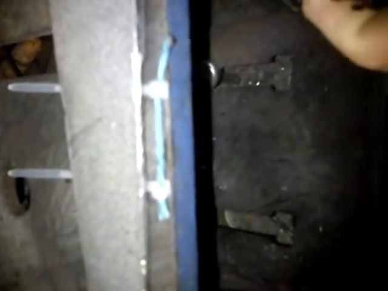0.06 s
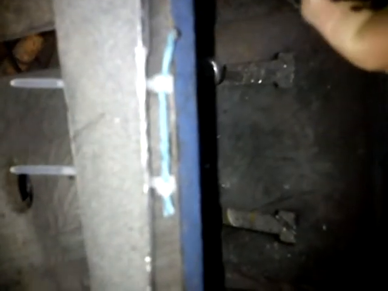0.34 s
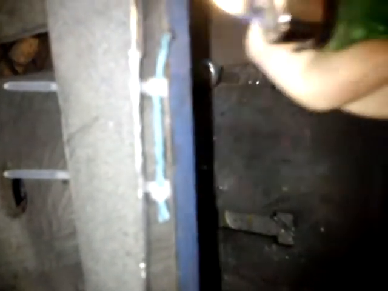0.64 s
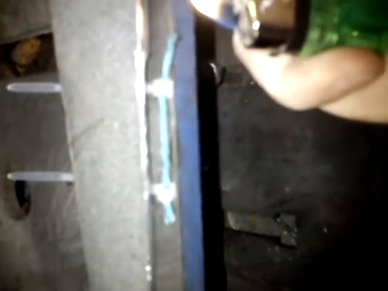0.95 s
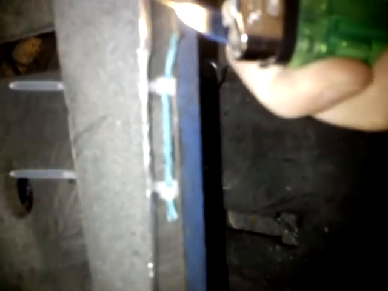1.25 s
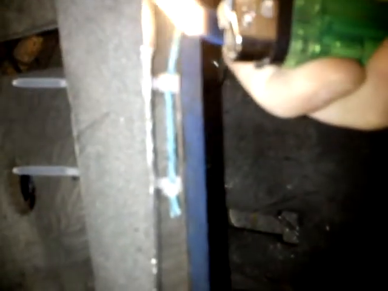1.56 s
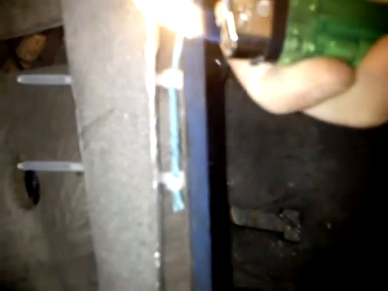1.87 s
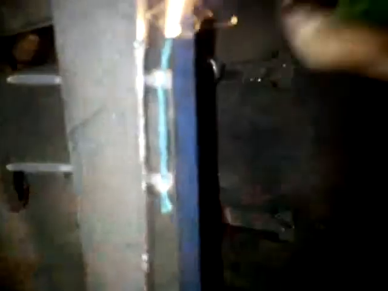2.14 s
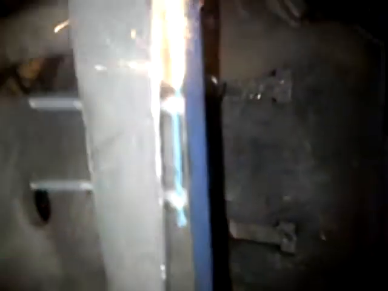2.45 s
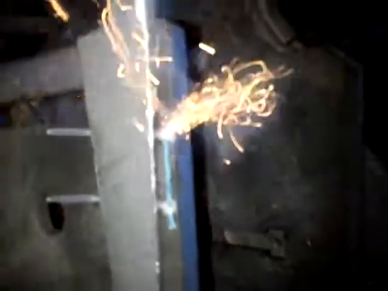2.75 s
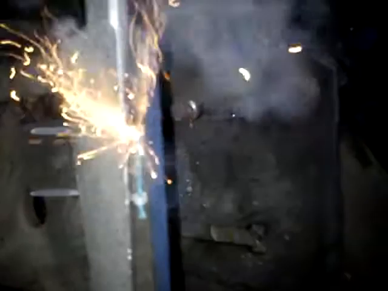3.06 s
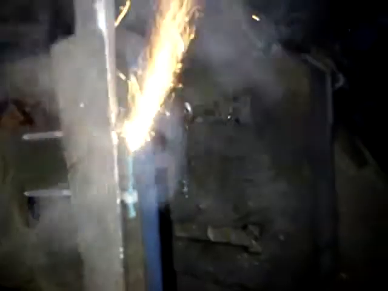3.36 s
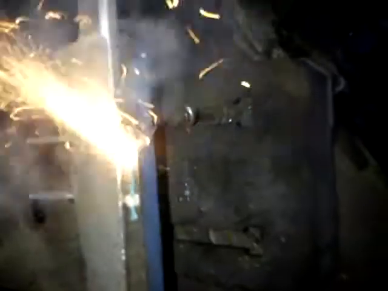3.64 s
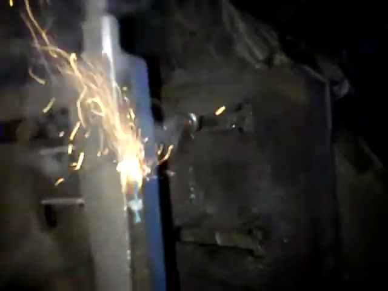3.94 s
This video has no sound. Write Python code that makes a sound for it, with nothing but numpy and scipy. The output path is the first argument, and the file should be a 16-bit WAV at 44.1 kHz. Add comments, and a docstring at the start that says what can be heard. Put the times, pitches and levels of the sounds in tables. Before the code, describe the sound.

A lighter flicks, then a fuse catches and hisses, choking briefly before flaring again.

```python
"""A faint hum hangs in the outdoor air; a flint lighter clicks and is struck to light a fuse on a board.
Friction of wheel on flint rings the lighter's metal hood and throws sparks. The fuse sputters, catches
and burns as a turbulent jet of hissing gas and sparks, which chokes under a tie and bursts out again.
Hard surfaces close by colour the hiss with resonances and short echoes."""
import sys
import numpy as np
from scipy import signal
from scipy.fft import rfft, irfft
from scipy.io import wavfile

SR = 44100
rng = np.random.default_rng(int(sys.argv[2]) if len(sys.argv) > 2 else 0)


def int16_out(signal):
    """Quantize to a 16-bit WAV file."""
    q = np.round(np.clip(np.atleast_2d(signal).T, -1, 1) * 32767)
    wavfile.write(sys.argv[1], SR, q.astype(np.int16))


N = 176400
T = np.arange(N) / SR


def from_db(db):
    """Decibels to amplitude ratio."""
    return 10 ** (np.asarray(db) / 20)


def unit_power(x):
    """Normalisation to a mean square of one."""
    return x / np.sqrt(np.mean(x ** 2) + 1e-20)


def in_time(rows):
    """Linear interpolation of each column at every sample."""
    times, *columns = np.transpose(rows)
    return [np.interp(T, times, column) for column in columns]


def colour(x, spectrum):
    """Minimum-phase filtering to a spectral shape, with unit power gain."""
    hz, db = np.transpose(spectrum)
    grid = np.maximum(np.arange(N + 1) * SR / (2 * N), 1)
    gain = unit_power(from_db(np.interp(np.log(grid), np.log(hz), db)))
    cepstrum = irfft(np.log(gain))
    cepstrum[1:N] *= 2
    return irfft(rfft(x, 2 * N) * np.exp(rfft(cepstrum[:N], 2 * N)))[:N]


def noise(spectrum):
    """Filtered Gaussian noise of unit power."""
    return colour(rng.standard_normal(N), spectrum)


def resonate(x, hz, width):
    """A damped resonator with unit peak gain."""
    r = np.exp(-np.pi * width / SR)
    feedback = [1, -2 * r * np.cos(2 * np.pi * hz / SR), r * r]
    return signal.lfilter(np.array([1, 0, -1]) * (1 - r * r) / 2, feedback, x)


def flutter(spread_db, rate_hz=35):
    """Random amplitude modulation: a gain driven by low-passed noise."""
    r = np.exp(-2 * np.pi * rate_hz / SR)
    drift = signal.lfilter([1], [1, -2 * r, r * r], rng.standard_normal(N + SR))[SR:]
    return from_db(spread_db * unit_power(drift))


def grains(per_s, spread_db):
    """Shot noise: random impulses of uneven size, at unit power."""
    sizes = from_db(spread_db * np.minimum(rng.exponential(1, N), 4))
    return unit_power(sizes * rng.choice([-1, 1], N) * (rng.random(N) < per_s / SR))


def swell(start, rise, decay, db):
    """A transient's envelope: linear rise, exponential decay."""
    return from_db(db) * np.clip((T - start) / rise, 0, 1) * np.exp(-np.maximum(T - start - rise, 0) / decay)


def cracks(rows, spectrum, decay_s):
    """Impulsive sounds: damped noise bursts, each scaled to its peak level."""
    out = np.zeros(N)
    age = T[:SR // 50]
    bursts = rng.standard_normal((len(rows), len(age))) * np.exp(-age / decay_s)
    response = colour(1. * (T == 0), spectrum)[:len(age)]
    for (start, db), burst in zip(rows, bursts):
        crack = np.convolve(burst, response)[:len(age)]
        i = int(start * SR)
        out[i:i + len(age)] += from_db(db) * crack / np.abs(crack).max()
    return out


# Still air. Each row: frequency in Hz, relative level in dB.
AIR_SPECTRUM = [(15, -43), (25, -7), (86, -4.5), (191, -7), (229, -8.5), (269, -8), (299, -7), (332, -12.5),
                (421, -5.5), (493, -15.5), (713, -10.5), (1090, -17), (2460, -20), (8740, -30.5),
                (13700, -31)]
# A distant machine. Each row: frequency in Hz, resonator bandwidth in Hz, level in dB.
HUM_BANDS = [(298.1, 18, -66.5), (423.3, 19.6, -60.5), (694, 11, -67), (812, 8.9, -70)]

def background():
    """Narrow-band noise wavers in amplitude, heard as a hum over the broadband air."""
    hum = np.zeros(N)
    for hz, width, db in HUM_BANDS:
        band = resonate(rng.standard_normal(N), hz, width)
        hum += from_db(db) * unit_power(resonate(band, hz, width))
    return from_db(-54) * noise(AIR_SPECTRUM) + hum


# The lighter's clicks. Each row: start in seconds, peak level in dB.
CLICKS = [(.04, -39), (.053, -36), (.688, -37), (.712, -31), (.7305, -18), (.734, -17), (.7455, -22),
          (.756, -22), (.7755, -24.5), (1.088, -40.5)]
# Their spectrum. Each row: frequency in Hz, relative level in dB.
CLICK_SPECTRUM = [(100, -16), (900, -16), (2000, -2.5), (3500, 0), (4600, -14), (6500, -8.5), (9000, -24),
                  (11400, -17), (13000, -41)]

def lighter_clicks():
    """Brief impacts between hard parts radiate over a wide band."""
    return cracks(CLICKS, CLICK_SPECTRUM, decay_s=0.0014)


# The wheel's scrape and its spark shower. Each row: time in seconds, level in dB.
WHEEL_LEVELS = [(.678, -52), (.683, -50), (.697, -38.5), (.71, -35), (.718, -23), (.728, -24),
                (.731, -16.5), (.737, -28), (.748, -26), (.759, -40.5), (.78, -46), (.82, -56)]
SHOWER_LEVELS = [(.695, -72), (.704, -48), (.729, -41.5), (.742, -46), (.76, -58), (.79, -73)]
# The metal hood. Each row: frequency in Hz, bandwidth in Hz, relative gain in dB.
HOOD_MODES = [(1820, 80, -10), (2137, 55, 8), (2290, 80, -6), (2550, 90, -4), (2880, 100, -14),
              (3050, 100, -7), (3245, 68, 6.5), (3400, 80, 1), (3380, 55, -6), (3940, 60, -9),
              (5975, 81, -10), (6280, 61, -6), (7240, 120, -16)]
# Spectra of rasp and shower. Each row: frequency in Hz, relative level in dB.
RASP_SPECTRUM = [(100, -28), (700, -2.5), (1200, -9), (2000, 4), (3700, 10), (4500, -13), (6400, -16),
                 (9000, -24), (11400, -26), (13000, -42)]
SHOWER_SPECTRUM = [(2000, -25), (4500, -13), (6400, 0), (8000, 2), (9200, -10), (11300, -4), (12000, -14),
                   (13500, -26)]

def flint_wheel():
    """Forced vibration: teeth grinding the flint drive the hood's modes and throw sparks."""
    scrape_db, = in_time(WHEEL_LEVELS)
    shower_db, = in_time(SHOWER_LEVELS)
    turning = (T > WHEEL_LEVELS[0][0]) * (T < WHEEL_LEVELS[-1][0])
    teeth = grains(per_s=1700, spread_db=1.5)
    grind = unit_power(teeth + from_db(1) * rng.standard_normal(N))
    hood = unit_power(sum(from_db(db) * resonate(grind, hz, width) for hz, width, db in HOOD_MODES))
    rasp = from_db(0.5) * colour(grind, RASP_SPECTRUM)
    scrape = unit_power(hood + rasp) * from_db(scrape_db)
    shower = noise(SHOWER_SPECTRUM) * from_db(shower_db)
    return (scrape + shower) * turning


# The thumb's blows. Each row: start, rise and decay in seconds, level in dB.
THUMPS = [(0.73, 0.0025, 0.0053, -28), (.761, 0.0027, 0.0028, -34), (0.767, 0.0015, 0.005, -27.5),
          (.78, 0.01, 0.018, -43.5)]
# Their spectrum. Each row: frequency in Hz, relative level in dB.
THUMP_SPECTRUM = [(20, -29), (45, 7.5), (85, 0.5), (150, -10), (260, 4.5), (420, -4), (520, -12),
                  (660, -2.5), (950, -17), (4000, -48)]

def thumb_on_lever():
    """A soft impact on the gas lever excites mainly low frequencies."""
    return noise(THUMP_SPECTRUM) * sum(swell(*row) for row in THUMPS)


# Fizzes before the fuse catches. Each row: start, rise and decay in seconds, relative level in dB.
FIZZES = [(1.756, 0.0044, 0.02, -44.5), (1.778, .003, 0.0074, -53), (1.854, 0.0065, 0.0064, -43),
          (1.887, 0.0026, 0.0022, -38), (1.928, .005, .005, -33.5), (1.978, 0.0069, 0.012, -45.5),
          (2.011, 0.0076, 0.0063, -24), (2.036, .008, 0.024, -47.5), (2.068, .003, 0.0095, -47)]
# Single grains snapping. Each row: start in seconds, relative peak level in dB.
SNAPS = [(1.757, -30), (1.765, -38), (1.781, -31), (1.915, -31), (1.976, -38), (2.046, -30), (2.072, -41),
         (2.094, -28.5), (2.111, -32), (2.141, -29), (2.149, -33), (2.155, -30), (3.097, -25), (3.16, -20),
         (3.472, -12), (3.795, -24), (3.922, -16)]
# The spectrum of both. Each row: frequency in Hz, relative level in dB.
POWDER_SPECTRUM = [(150, -17), (600, -15), (1100, -10), (1750, -1), (2500, -3), (2900, -12), (3400, -2),
                   (4000, -3.5), (4600, -18), (5300, -9.5), (6400, -13.5), (8500, -25.5), (13000, -47)]

def sputters():
    """Uneven combustion: powder grains burn in short fizzes and snaps."""
    gas = noise(POWDER_SPECTRUM)
    crackle = colour(grains(per_s=1600, spread_db=2.5), POWDER_SPECTRUM)
    fizz = unit_power(gas + crackle) * sum(swell(*row) for row in FIZZES)
    return fizz + cracks(SNAPS, POWDER_SPECTRUM, decay_s=0.0006)


# Resonances beside the board. Each row: frequency in Hz, bandwidth in Hz, gain in dB.
NOOK_MODES = [(322.4, 12, 4.5), (429, 29, 2), (802, 37, -4), (1026, 22, -4), (1158, 25, -10),
              (1303, 29, -10), (1760, 30, -18), (2050, 17, -5.5), (2270, 33, -15), (2456, 50, -6.5),
              (2760, 31, -8), (3301, 19, -2), (3526, 60, -15), (3700, 38, -6), (4260, 45, -11)]
# The nearest reflection. Each row: time in seconds, delay in seconds.
ECHO_DELAYS = [(2.1, 0.0018), (2.5, 0.0016), (3.0, 0.0032), (3.3, .0041), (4, 0.004)]

def surroundings(x, level_db, t60_s=0.11):
    """Resonance, scattering and an echo whose comb filtering shifts as the flame travels."""
    delay, = in_time(ECHO_DELAYS)
    near = x + sum(from_db(db) * resonate(x, hz, width) for hz, width, db in NOOK_MODES)
    echo = np.interp(T - delay, T, near)
    tail = rng.standard_normal(SR // 2) * from_db(-60 * T[:SR // 2] / t60_s)
    scatter = signal.fftconvolve(near, tail / np.linalg.norm(tail))[:N]
    return from_db(level_db) * (near + from_db(-16.5) * echo + from_db(-9) * scatter)


# The jet before and after it chokes. Each row: time in seconds, relative hiss and sizzle levels in dB.
FIRST_BURN = [(2.13, -50, -65), (2.14, -49, -57), (2.154, -44.5, -56), (2.17, -24.5, -31.5),
              (2.18, -23, -33), (2.254, -25.5, -33.5), (2.29, -21, -28.5), (2.382, -24, -31.5),
              (2.464, -23.5, -29.5), (2.684, -25, -35), (2.86, -23, -34), (2.898, -29, -37),
              (2.908, -19.5, -29), (2.924, -29, -37.5), (3.06, -48, -52)]
SECOND_BURN = [(3.07, -40.5, -50), (3.1, -33.5, -44.5), (3.124, -41, -48), (3.154, -38, -50),
               (3.186, -29, -34.5), (3.396, -31, -40), (3.48, -27.5, -37), (3.492, -29, -40.5),
               (3.644, -28, -37.5), (3.66, -23.5, -36.5), (3.704, -26, -33.5), (3.79, -31, -38),
               (3.804, -22.5, -32), (3.976, -28.5, -38), (4.0, -25, -36)]
# Its low bands. Each row: time in seconds, relative roar and rumble levels in dB.
LOW_BURN = [(2.13, -64, -70), (2.144, -48, -71), (2.156, -58, -60), (2.17, -33.5, -41), (2.222, -25.5, -35),
            (2.436, -33.5, -43), (2.66, -31.5, -38.5), (2.858, -31.5, -45), (2.89, -34.5, -42),
            (2.906, -29, -34), (2.936, -34, -38), (3.056, -47.5, -63), (3.082, -45, -52), (3.134, -45, -53),
            (3.17, -45, -43), (3.182, -32.5, -44), (3.264, -38.5, -46.5), (3.618, -30.5, -38.5),
            (3.666, -31.5, -43), (3.696, -35, -40), (3.77, -36, -46), (3.796, -29.5, -33),
            (3.906, -32.5, -43), (4.0, -32, -42)]
# The spectra of its bands. Each row: frequency in Hz, relative level in dB.
HISS_BEFORE_TIE = [(400, -36), (1000, -10), (1500, -11), (1750, 2), (2050, -2), (2400, 0.5), (2620, -6),
                   (2750, -6), (3080, -6.5), (3220, 2), (3500, 2), (4000, -2.5), (4400, -7), (4800, -19),
                   (7000, -55)]
HISS_PAST_TIE = [(400, -33), (1000, -8), (1500, -6.5), (1900, -2), (2200, 3.5), (2550, -3), (2750, -1.5),
                 (3050, -3), (3300, 2), (3750, 1.5), (4250, -1), (4650, -11), (5000, -24), (7000, -37.5)]
SIZZLE_SPECTRUM = [(2500, -44), (4400, -9.5), (5100, -1), (5700, 1.5), (6100, -2), (6900, -5.5),
                   (7800, -11.5), (8700, -15), (10000, -22), (13500, -37)]
ROAR_SPECTRUM = [(150, -30), (450, -10), (650, -0.5), (880, -3.5), (1150, 2), (1600, 0), (2600, -10.5),
                 (6000, -40.5)]
RUMBLE_SPECTRUM = [(25, -30), (60, -22), (115, -12), (175, 0), (230, -1), (285, 0), (325, 0.5), (370, -5),
                   (480, -6), (700, -11), (2000, -45)]

def jet(tie_s=2.75, crossing_s=0.4):
    """Turbulence radiates broadband noise, crackling with sparks; the hiss changes colour at the tie."""
    hiss_db, sizzle_db = in_time(list(FIRST_BURN) + list(SECOND_BURN))
    roar_db, rumble_db = in_time(LOW_BURN)
    sparks = from_db(-15.5) * grains(per_s=170, spread_db=5.5)
    gas = rng.standard_normal(N) + sparks
    past_tie = np.clip(.5 + (T - tie_s) / crossing_s, 0, 1)
    hiss = (1 - past_tie) * colour(gas, HISS_BEFORE_TIE) + past_tie * colour(gas, HISS_PAST_TIE)
    hiss *= from_db(hiss_db + 0.5)
    sizzle = colour(rng.standard_normal(N) + sparks, SIZZLE_SPECTRUM) * from_db(sizzle_db + 1)
    roar = noise(ROAR_SPECTRUM) * from_db(roar_db + 0.5)
    rumble = noise(RUMBLE_SPECTRUM) * from_db(rumble_db + 0.5)
    flame = (hiss + sizzle) * flutter(spread_db=0.48) + (roar + rumble) * flutter(spread_db=0.84)
    return flame * (T > FIRST_BURN[0][0])


# Bursts of trapped gas. Each row: start, rise and decay in seconds, relative level in dB, low cut in Hz.
PUFFS = [(2.901, 0.0033, 0.0058, -22.5, 40), (2.933, .003, 0.036, -41, 35), (3.185, 0.0017, .004, -25, 150),
         (3.793, 0.0016, 0.0016, -23, 180), (3.807, 0.0035, 0.051, -38, 70)]
# Their spectrum. Each row: frequency in Hz, relative level in dB.
PUFF_SPECTRUM = [(20, -14), (50, 3), (150, -4), (400, -3), (1100, -6.5), (2000, -13), (6000, -49)]

def puffs():
    """Sudden release of pressure makes dull blows as the casing gives way."""
    gas = noise(PUFF_SPECTRUM)
    out = np.zeros(N)
    for start, rise, decay, db, hz in PUFFS:
        low_cut = signal.butter(2, hz, "high", fs=SR, output="sos")
        out += signal.sosfilt(low_cut, gas) * swell(start, rise, decay, db)
    return out


def scene():
    """Superposition of background, lighter and fuse in one channel."""
    lighter = flint_wheel() + lighter_clicks() + thumb_on_lever()
    fuse = surroundings(sputters() + jet(), level_db=-1.5) + puffs()
    return (background() + lighter + fuse)[None]


def record(dry, cutoff_hz=13950):
    """Band limiting: a steep elliptic low-pass removes the highest treble."""
    return signal.sosfilt(signal.ellip(12, .1, 80, cutoff_hz, fs=SR, output="sos"), dry)


dry = scene()
out = record(dry)
int16_out(out)
```